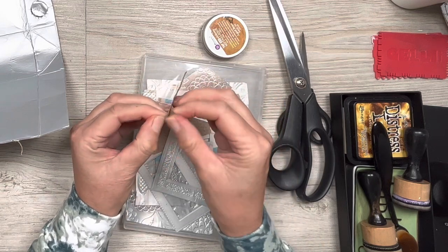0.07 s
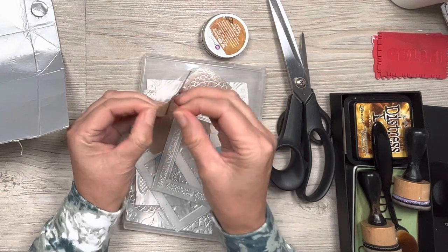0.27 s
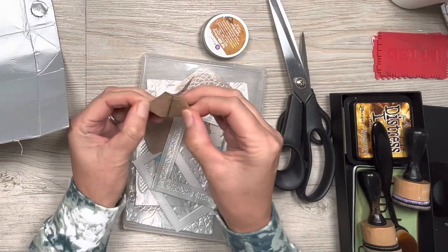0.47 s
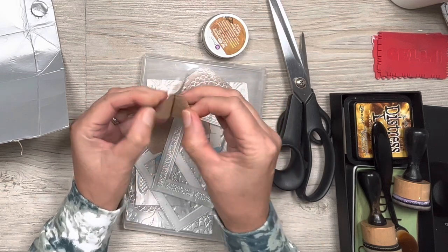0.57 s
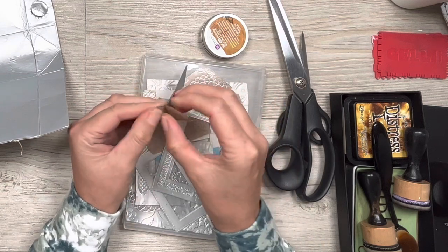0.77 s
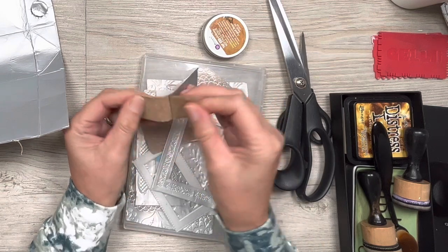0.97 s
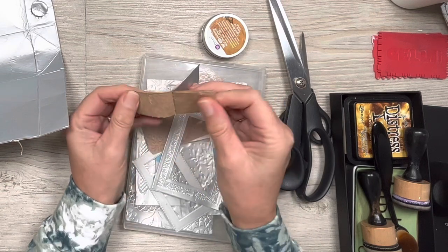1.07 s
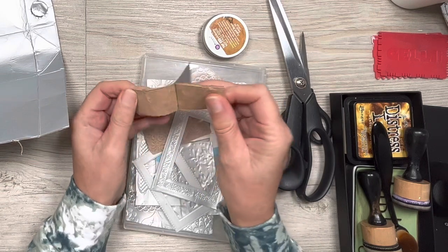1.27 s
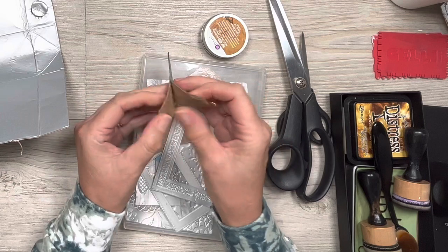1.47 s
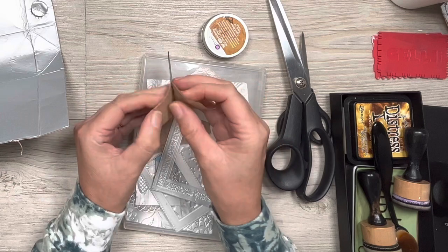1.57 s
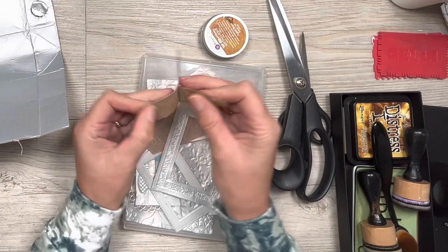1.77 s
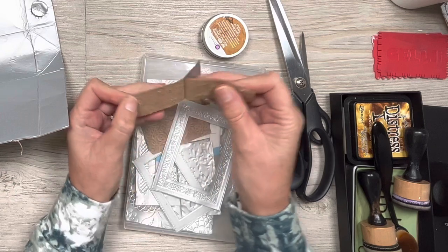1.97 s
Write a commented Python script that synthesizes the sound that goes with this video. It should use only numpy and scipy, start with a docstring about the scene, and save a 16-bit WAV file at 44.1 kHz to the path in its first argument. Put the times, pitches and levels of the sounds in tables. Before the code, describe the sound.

Thin cardboard is peeled apart by hand, close in stereo. A crisp, fibrous rip runs from 0.15 to 0.4 seconds, a longer one from 0.85 to 1.2 with a tiny high falling squeak near 0.96, and a last one from 1.75 to 2.0. Between them fingertips brush the card and it ticks as it bends. Small quiet room, faint low rumble and hiss.

```python
"""At a table in a quiet room, two hands peel apart a strip of carton close to a pair of microphone ports.
Three papery rips are dense trains of snapping fibres; the freed flap is a hollow resonance they shake.
The second rip skids into a short squeak: snaps through a narrow resonance that mostly falls in pitch.
Around the rips, fingertips brush the card in swells of grain, and it ticks in short bursts as it bends.
Low tugs, faint ringing from the table, near bounces, a steady rumble and faint hiss lie behind."""
import sys
import numpy as np
from scipy import signal
from scipy.fft import rfft, irfft, next_fast_len
from scipy.io import wavfile
from scipy.ndimage import uniform_filter1d

SR = 44100
rng = np.random.default_rng(int(sys.argv[2]) if len(sys.argv) > 2 else 0)


def transcribe(signal):
    """Save signal, clipped to [-1, 1], as a 16-bit WAV file at the path in sys.argv[1]."""
    frames = np.atleast_2d(signal).T
    limited = np.clip(frames, -1, 1)
    pcm = np.round(limited * 32767).astype(np.int16)
    wavfile.write(sys.argv[1], SR, pcm)


N = 88861
T = np.arange(N) / SR  # time [s]
HZ = np.fft.rfftfreq(2 * N, 1 / SR)  # frequency axis of the colouring filters


# One list per rip: (time [s], tearing level [dB], flap level [dB], fizz level above the tearing [dB]);
# the levels are before the trims below
RIP_CURVES = [
    [(0.147, -71, -92, 11), (0.153, -67, -91, 0), (0.181, -55.5, -78, -1), (0.239, -48, -63.5, -0.5),
     (0.251, -47.5, -76, -6), (0.265, -50.5, -60, -0.5), (0.287, -48.5, -66.5, -4.5),
     (0.345, -46, -57.5, 2), (0.363, -44.5, -56.5, -3.5), (0.418, -62, -72, -8.5)],
    [(0.855, -47.5, -78, 16.5), (0.859, -50.5, -85, -2), (0.881, -50, -63.5, 3.5),
     (0.917, -42.5, -65.5, -2), (0.997, -47, -49, -0.5), (1.055, -51.5, -54.5, -2), (1.067, -54, -61, -2),
     (1.095, -58, -72, -2), (1.111, -48.5, -50.5, -4), (1.117, -50.5, -53, -0.5), (1.173, -50, -55, 4.5),
     (1.215, -64, -73.5, -10)],
    [(1.745, -67, -75, -10), (1.765, -61.5, -71, -5), (1.779, -52, -66.5, 4.5), (1.807, -53.5, -77, -4),
     (1.865, -49, -68.5, -3.5), (1.879, -47, -53, 0.5), (1.895, -45.5, -61, 0.5), (1.913, -45, -51.5, 1.5),
     (1.953, -42, -46.5, 4.5), (1.999, -52, -68.5, 4), (2.01, -53, -70, -1)],
]
# Colour of the tearing fibres: (frequency [Hz], relative level [dB])
TEAR_COLOUR = [(100,-34),(400,-18),(900,-19),(1500,-7),(2200,-9.5),(3200,-2.5),(4300,-2),(5200,1.5),(6200,4.5),(7500,1),(9000,0.5),(10500,-10.5),(12500,-19.5),(16000,-34.5)]
# Colour of the finest, highest fizz: (frequency [Hz], relative level [dB])
FIZZ_COLOUR = [(4000,-75.5),(8500,-15.5),(10500,3.5),(12300,3),(13600,5),(14800,8.5),(15700,-2.5)]
# Colour of the loose flap: (frequency [Hz], relative level [dB])
FLAP_COLOUR = [(100,-18),(300,-26),(480,-1.5),(720,1.5),(950,4.5),(1250,5.5),(1700,3),(2400,-8.5),(4000,-30)]
TEAR_TRIM_DB, FIZZ_TRIM_DB, FLAP_TRIM_DB = 4, 5, -1.5
FIBRES_PER_S, FIBRE_SPREAD_DB = 7000, 3.0
RIP_ATTACK_S, RIP_RELEASE_S = 0.0035, 0.025
CATCH_HZ, CATCH_DB = 258, 1.5  # the tear front catches and lets go
SURGE_HZ, SURGE_DB = 56.3, 0.8  # the pull is uneven
# The flap's pitch falls as it grows longer
FLAP_HZ, FLAP_START_HZ, FLAP_SETTLE_S, FLAP_WIDTH_HZ = 822, 1610, 0.076, 360


def rips():
    """Fibres snap in clumps along the tear front and shake the loose flap."""
    tear, flap, fizz = np.zeros((3, N))
    flap_hz = np.full(N, float(FLAP_HZ))
    for rip in RIP_CURVES:
        s, tear_db, flap_db, fizz_db = np.transpose(rip)
        attack = np.clip((T - s[0]) / RIP_ATTACK_S, 0, 1)
        release = np.exp(-np.maximum(T - s[-1], 0) / RIP_RELEASE_S)
        on = attack * release
        tear += on * amp(np.interp(T, s, tear_db))
        flap += on * amp(np.interp(T, s, flap_db))
        fizz += on * amp(np.interp(T, s, tear_db + fizz_db))
        settling = np.exp(-np.abs(T - s[0]) / FLAP_SETTLE_S)
        flap_hz += on * (FLAP_START_HZ - FLAP_HZ) * settling
    clumps = unit(amp(CATCH_DB * wander(CATCH_HZ) + SURGE_DB * wander(SURGE_HZ)))
    coarse = fibres(FIBRES_PER_S, FIBRE_SPREAD_DB) * clumps
    fine = fibres(FIBRES_PER_S, FIBRE_SPREAD_DB) * clumps
    hollow = unit(heard(resonate(coarse, flap_hz, FLAP_WIDTH_HZ), FLAP_COLOUR))
    tearing = heard(patchy(coarse) * tear, TEAR_COLOUR) * amp(TEAR_TRIM_DB)
    fizzing = heard(patchy(fine) * fizz, FIZZ_COLOUR) * amp(FIZZ_TRIM_DB)
    return tearing + fizzing + hollow * flap * amp(FLAP_TRIM_DB)


# The layers skid briefly: (time [s], pitch [Hz], level [dB])
SQUEAK_CURVE = [(.952,7400,-74),(0.96,6960,-41),(0.974,5900,-58),(1.0,5600,-52),(1.025,5700,-76)]
SQUEAK_WIDTH_HZ = 590


def squeak():
    """A rough, mostly falling chirp of one layer skidding over the other: snaps through two resonances."""
    s, hz, db = np.transpose(SQUEAK_CURVE)
    pitch = np.interp(T, s, hz)
    snaps = fibres(FIBRES_PER_S, FIBRE_SPREAD_DB)
    narrow = resonate(snaps, pitch, SQUEAK_WIDTH_HZ)
    chirp = resonate(narrow, pitch, 2 * SQUEAK_WIDTH_HZ)
    sounding = (T > s[0]) * (T < s[-1])
    return unit(heard(chirp, TEAR_COLOUR)) * amp(np.interp(T, s, db)) * sounding


# Fingertip brushes: (time of the peak [s], rise [s], fall [s], level [dB])
BRUSH_SWELLS = [(0.038,0.021,0.015,-61),(0.554,0.02,0.011,-50.5),(0.662,0.047,0.037,-61),(.72,0.016,0.039,-67.5),(0.801,0.02,0.017,-52),(0.849,0.0095,0.0092,-54),(1.297,0.012,0.007,-74),(1.348,0.022,0.035,-58.5),(1.395,0.0093,0.019,-52.5),(1.44,0.028,0.08,-67.5),(1.581,0.048,0.024,-63),(1.66,0.039,0.036,-62),(1.744,0.016,.02,-63)]
# Colour of skin on card: (frequency [Hz], relative level [dB])
BRUSH_COLOUR = [(100,-45),(500,-20),(950,-9),(1600,-10),(3000,-3),(4400,-1.5),(6500,3),(8500,-7),(10500,-7.5),(13000,-11.5),(15700,-5.5)]


def fingertips():
    """Skin slides over the grain of the card in short swells."""
    level = np.zeros(N)
    for s, rise, fall, db in BRUSH_SWELLS:
        distance = np.abs((T - s) / np.where(T < s, rise, fall))
        level += amp(db) * np.exp(-distance ** 1.22)
    grain = fibres(rate=5800, spread_db=0) * unit(amp(2 * wander(hz=140)))
    return heard(patchy(grain) * level, BRUSH_COLOUR)


# Ticks of the bending card: (time [s], sharp snap level [dB], dull knock level [dB])
TICK_TIMES = [(0.034,-56,-58),(.169,-52,-59),(0.5275,-48,-43),(0.859,-42,-71),(0.8625,-47,-65),(1.109,-37.5,-54),(1.2966,-56,-78),(1.3354,-78,-54.5),(1.357,-74.5,-64),(1.41,-59,-67),(1.4836,-74,-61),(1.504,-88,-60),(1.582,-74,-64),(1.62,-65,-85),(1.776,-44,-80),(1.782,-42,-63)]
# Colour of the dull knock: (frequency [Hz], relative level [dB])
KNOCK_COLOUR = [(100,-30),(400,-12),(900,1),(2000,-2),(3200,-4),(4400,-1),(6000,-12),(15000,-30)]
TICK_DECAY_S = 0.0012  # time to fall to 1/e


def ticks():
    """A crease gives way: a sharp snap and a dull knock of the card, both dying at once."""
    snap, knock = np.zeros((2, N))
    for s, snap_db, knock_db in TICK_TIMES:
        fade = (T >= s) * np.exp(-np.abs(T - s) / TICK_DECAY_S)
        snap += amp(snap_db) * fade
        knock += amp(knock_db) * fade
    burst = rng.standard_normal((2, N))
    sharp = heard(burst * snap, TEAR_COLOUR) + amp(-1) * heard(burst * snap, FIZZ_COLOUR)
    return sharp + heard(burst * knock, KNOCK_COLOUR)


# The hands tug at the strip: (time of the peak [s], width [s], level [dB])
TUGS = [(.04,0.06,-80.5),(.165,0.039,-76),(1.725,.012,-79),(1.93,0.028,-70),(1.99,0.047,-69)]
# Colour of the low push: (frequency [Hz], relative level [dB])
TUG_COLOUR = [(25,-13),(50,-5),(80,-1.5),(150,-3),(300,-9),(600,-19.5),(2000,-87)]


def bump():
    """Soft low pushes of noise as the hands tug at the strip."""
    level = sum(amp(db) * np.exp(-((T - s) / width) ** 2) for s, width, db in TUGS)
    return level * unit(heard(rng.standard_normal((2, N)), TUG_COLOUR))


# Ringing of things on the table: (frequency [Hz], level against the direct sound [dB])
TABLE_RINGS = [(4247,0),(4461,-2),(6095,-4),(7078,-11.5),(7935,-13.5),(12192,2.5),(13165,-9)]
RING_T60_S = 0.034


def ringing(x):
    """Hard things on the table ring faintly in sympathy, as decaying cosines."""
    t = T[:SR // 4]
    fade = amp(-60 * t / RING_T60_S)
    cosines = sum(amp(db) * np.cos(2 * np.pi * hz * t) for hz, db in TABLE_RINGS)
    modes = cosines * 2 * fade / fade.sum()
    return x + signal.fftconvolve(x, modes[None], axes=1)[:, :N]


ECHO_DB, ECHO_SPAN_S = -8, 0.012
ROOM_DB, ROOM_T60_S = -24, 0.25


def room(x):
    """A few near bounces shared by both ports, then a short diffuse tail."""
    t = T[:SR // 2]
    near = np.zeros(len(t))
    bounce = rng.random((8, 2))
    delay_s = 0.001 + ECHO_SPAN_S * bounce[:, 0]
    near[(delay_s * SR).astype(int)] = np.sign(bounce[:, 1] - 0.5)
    tail = rng.standard_normal((2, len(t))) * amp(-60 * t / ROOM_T60_S) * (t > 0.005)
    bounces = amp(ECHO_DB) * near / np.linalg.norm(near)
    response = bounces + amp(ROOM_DB) * tail / np.linalg.norm(tail[0])
    return x + signal.fftconvolve(x, response, axes=1)[:, :N]


# Colour of the low rumble: (frequency [Hz], relative level [dB])
RUMBLE_COLOUR = [(20,-30),(38,-12),(56,0),(75,-7),(110,-15),(200,-27),(500,-50)]
# Colour of the hiss: (frequency [Hz], relative level [dB])
HISS_COLOUR = [(60,-1),(200,-4),(450,-8),(1000,-9),(2000,-11),(6000,-9),(10000,-16),(16000,-21)]
RUMBLE_DB, HISS_DB = -79, -76


def background():
    """A low steady rumble and faint hiss, both coloured noise."""
    rumble = amp(RUMBLE_DB) * heard(rng.standard_normal((2, N)), RUMBLE_COLOUR)
    hiss = amp(HISS_DB) * heard(rng.standard_normal((2, N)), HISS_COLOUR)
    return rumble + hiss


# Left-right likeness of the sound over frequency: (frequency [Hz], likeness [0 to 1])
STEREO_LIKENESS = [(50,.85),(200,.4),(450,.35),(700,.85),(1800,.78),(2700,.45),(4500,.3),(5300,.99),(5600,.99),(6800,.8),(8000,.95),(8900,.75),(9700,1),(10700,1),(11400,.8),(12500,.98),(13700,.85),(14600,1)]
# Left-right phase difference over frequency: (frequency [Hz], left ahead of right [rad])
STEREO_PHASE = [(50,0),(200,-.3),(400,-1.4),(650,0),(900,-.2),(1300,-.6),(2000,.7),(3200,3.1),(4200,1.8),(5300,3.05),(5700,3.25),(6500,4.3),(7900,6.28),(8800,7.5),(9700,9.3),(10700,9.55),(11300,10.9),(12500,12.57),(13600,13.6),(14600,15.5),(15800,15.9)]
# Left-right balance over frequency: (frequency [Hz], left minus right [dB])
STEREO_BALANCE = [(100,0),(500,3),(1100,1.5),(1600,-1.5),(2400,2),(3200,-3),(4800,-5),(5400,0),(16000,0)]


def heard(drive, spectrum):
    """Colours two unrelated drives causally and blends them into left and right."""
    log_gain = np.log(unit(amp(read(spectrum))))
    mirrored = np.r_[log_gain, log_gain[-2:0:-1]]
    colour = np.exp(np.conj(signal.hilbert(mirrored)))[:N + 1]  # minimum phase
    a, b = rfft(drive, 2 * N) * colour
    same = np.clip(read(STEREO_LIKENESS), 0, 1)
    side = amp(read(STEREO_BALANCE) / 2)
    right = (same * a + np.sqrt(1 - same ** 2) * b) * np.exp(-1j * read(STEREO_PHASE))
    return irfft(np.array([a * side, right / side]))[:, :N]


def fibres(rate, spread_db):
    """Two trains of tiny snaps at random times and signs, most weak and a few strong if spread."""
    size = amp(spread_db * np.minimum(rng.exponential(1, (2, N)), 4))
    sign = rng.choice([-1, 1], (2, N))
    return unit(size * sign * (rng.random((2, N)) < rate / SR))


BANDS_HZ, COLOUR_DB, COLOUR_HZ = (880, 14400), 2.5, 8.7  # each patch of card has its own colour


def patchy(x):
    """Lets overlapping bands swell and sink on their own."""
    centres = np.linspace(*BANDS_HZ, num=14)
    size = 2 * next_fast_len(N // 2 + 1)
    spectrum, hz = rfft(x, size), np.fft.rfftfreq(size, 1 / SR)
    total = np.zeros((2, N))
    for band in np.eye(len(centres)):  # one band at a time
        part = irfft(spectrum * np.interp(hz, centres, band))[:, :N]
        total += part * amp(COLOUR_DB * wander(COLOUR_HZ))
    return unit(total)


def resonate(x, hz, width_hz):
    """A resonance that follows the curve hz: shift down, smooth, shift back up."""
    turn = np.exp(2j * np.pi * np.cumsum(hz) / SR)
    r = np.exp(-np.pi * width_hz / SR)
    return (turn * signal.lfilter([1 - r], [1, -r], x / turn)).real


def wander(hz):
    """Smooth chance of rms 1, up to roughly the given rate."""
    size = max(int(SR / hz / 3), 1)
    return unit(uniform_filter1d(uniform_filter1d(rng.standard_normal(N), size), size))


def read(points):
    """A table over frequency, joined on a log axis."""
    f, value = np.transpose(points)
    return np.interp(np.log(HZ + 1), np.log(f), value)


def unit(x):
    """Scales to rms 1."""
    return x / np.sqrt(np.mean(np.abs(x) ** 2) + 1e-20)


def amp(db):
    """Decibels to gain."""
    return 10 ** (np.asarray(db) / 20)


def scene():
    """The card and hands close to the ports, in the room, over the steady background."""
    card = rips() + squeak() + fingertips() + ticks()
    return room(ringing(card) + bump()) + background()


def record(dry):
    """The recorder's band limit, a steep low-pass."""
    taps = signal.firwin(511, 15800, window=("kaiser", 9), fs=SR)  # edge in Hz
    return signal.oaconvolve(dry, taps[None], "same")


dry = scene()
out = record(dry)
transcribe(out)
```